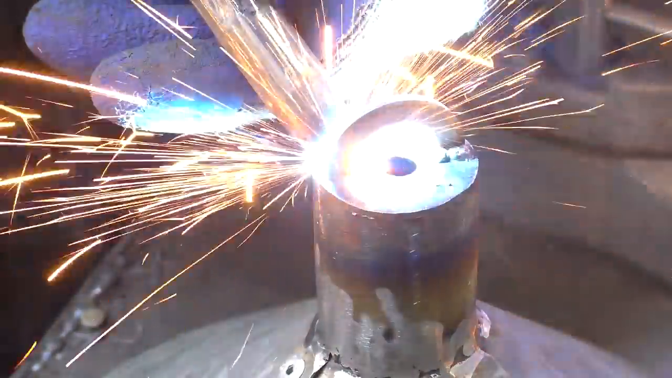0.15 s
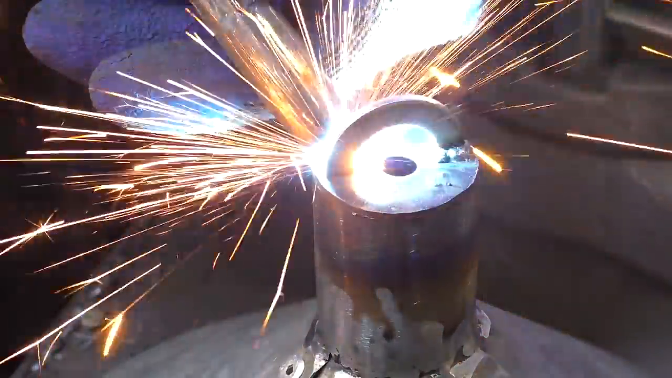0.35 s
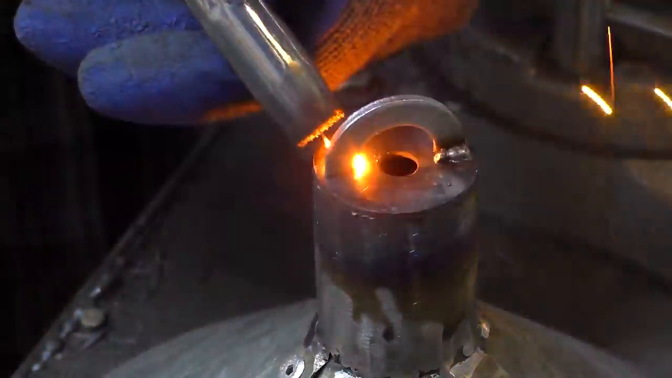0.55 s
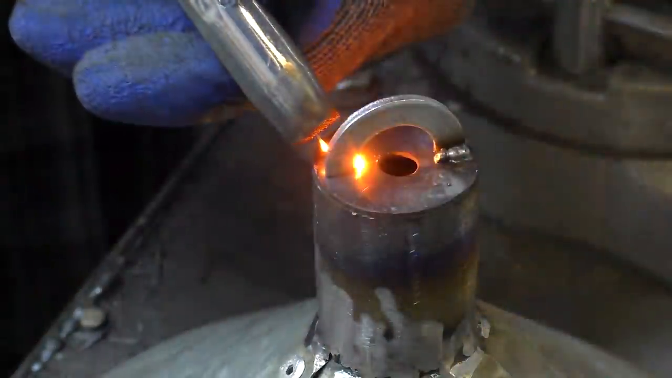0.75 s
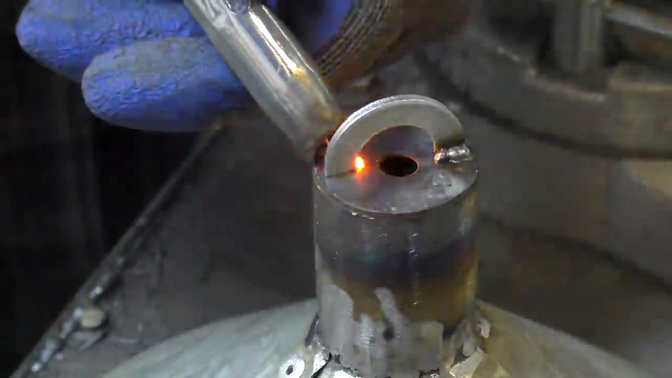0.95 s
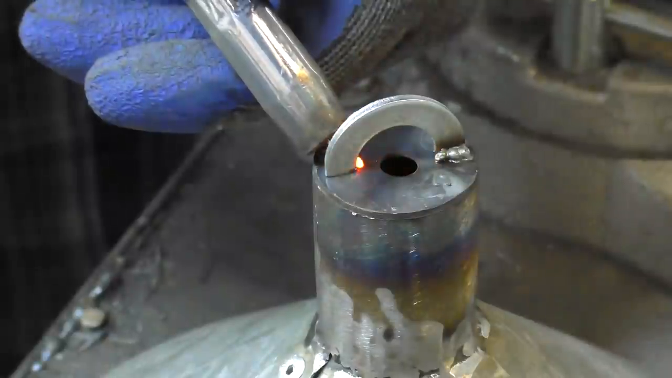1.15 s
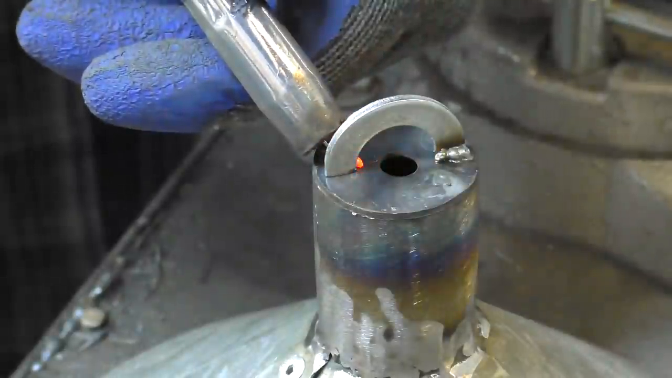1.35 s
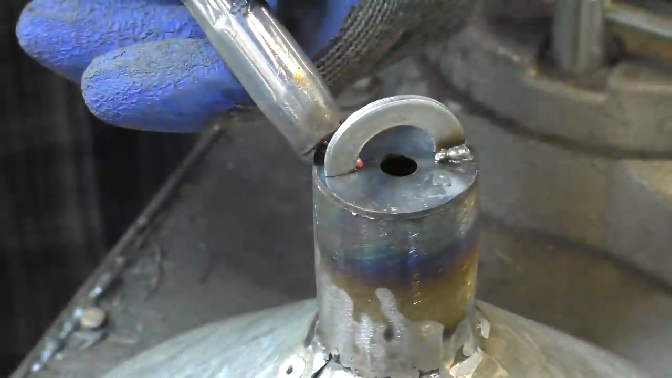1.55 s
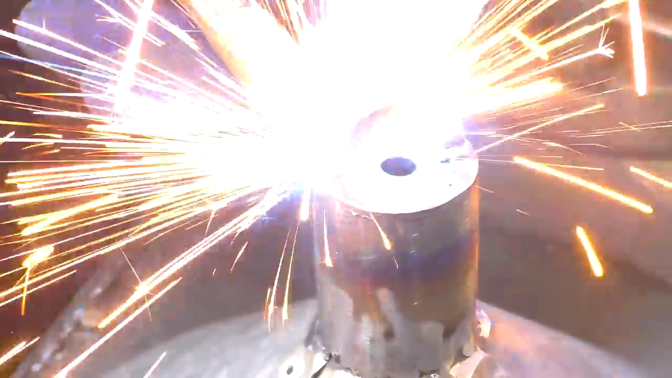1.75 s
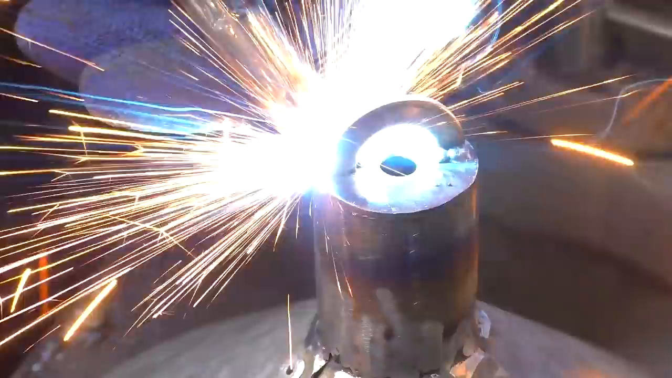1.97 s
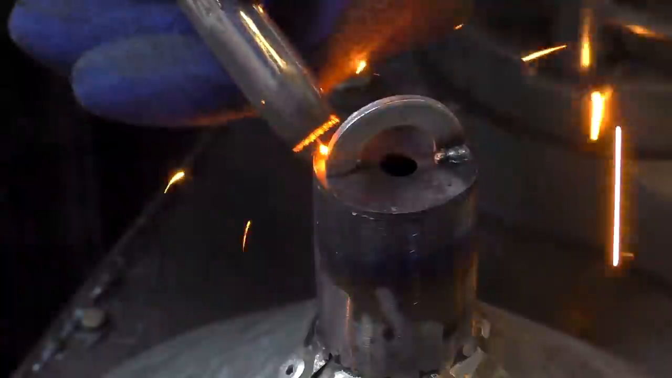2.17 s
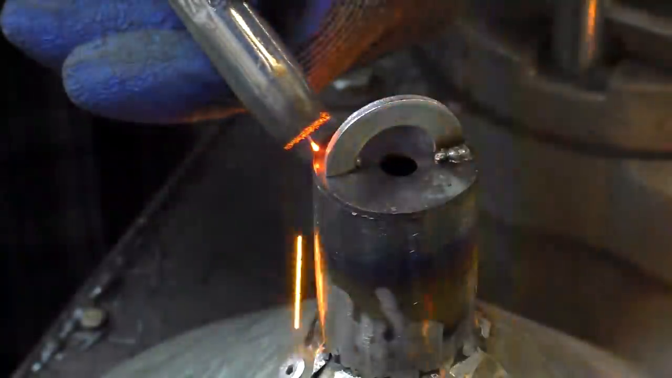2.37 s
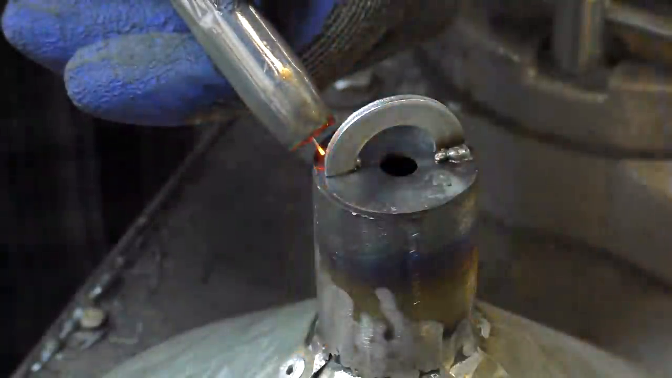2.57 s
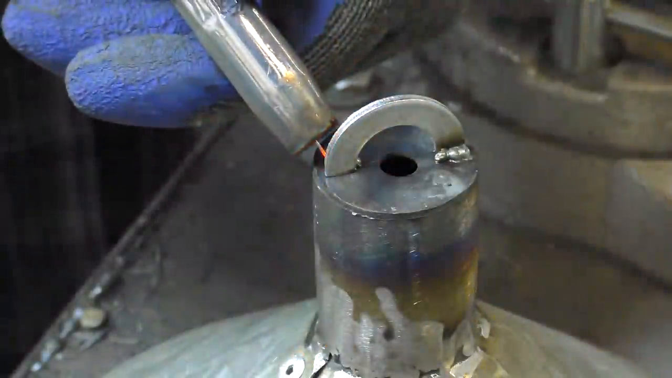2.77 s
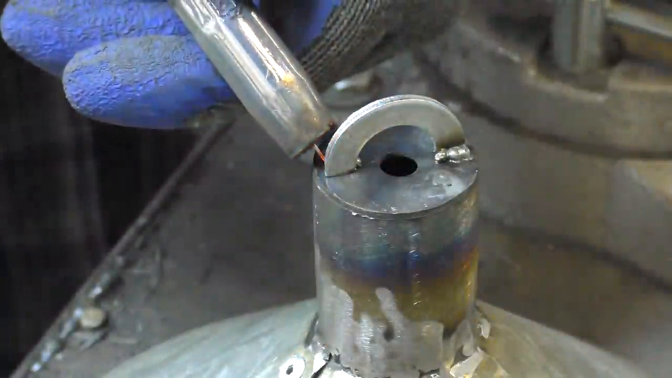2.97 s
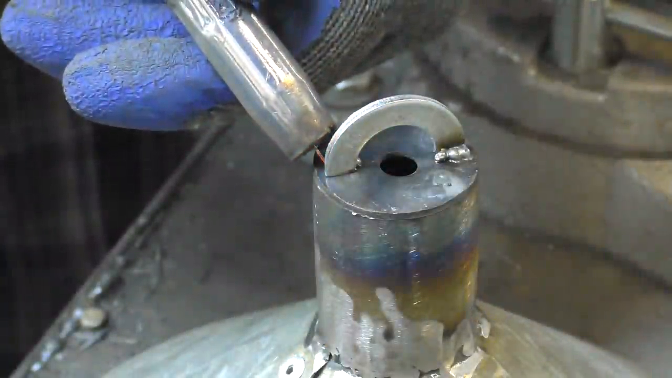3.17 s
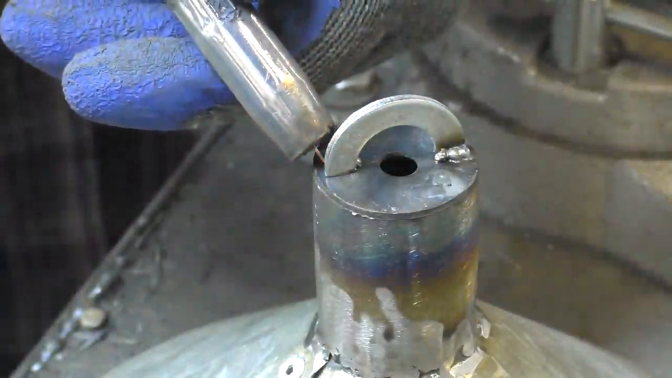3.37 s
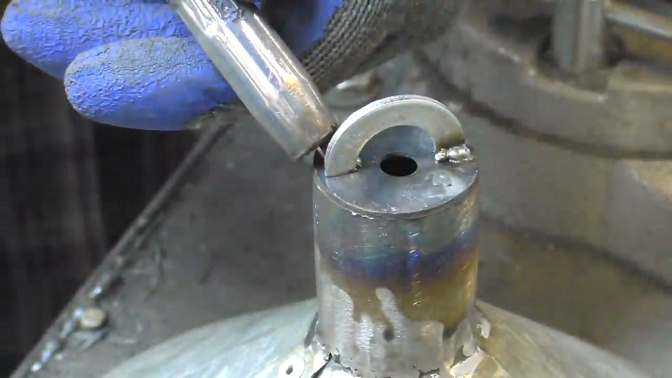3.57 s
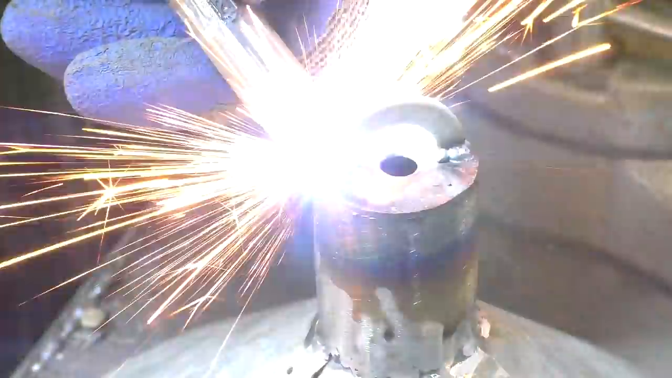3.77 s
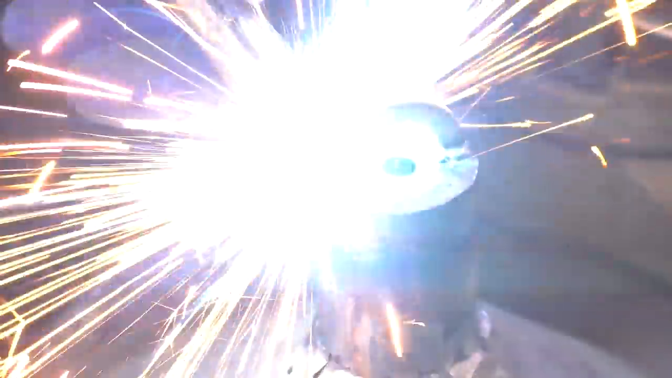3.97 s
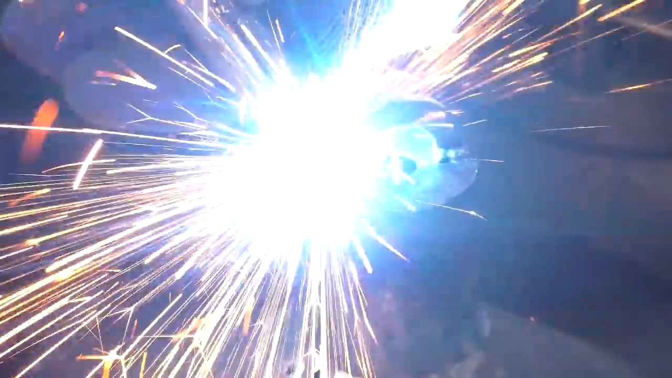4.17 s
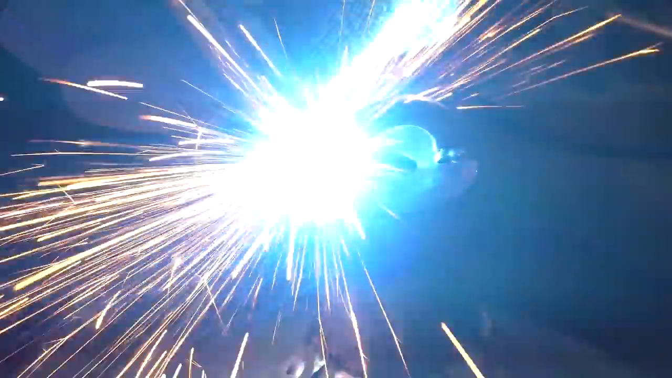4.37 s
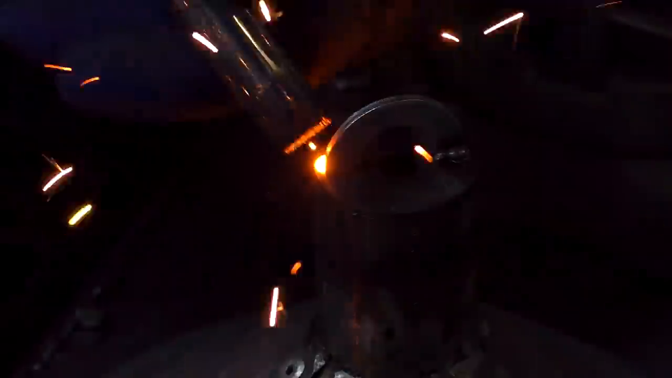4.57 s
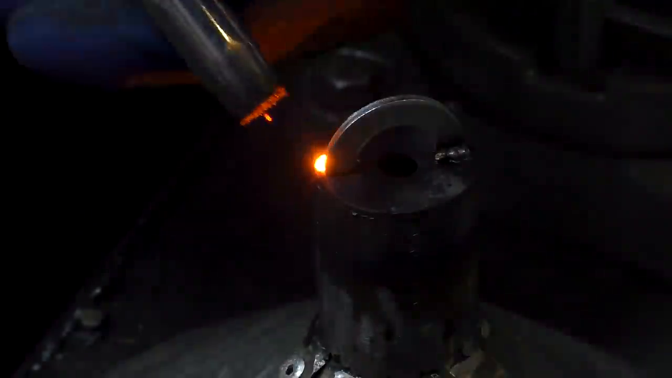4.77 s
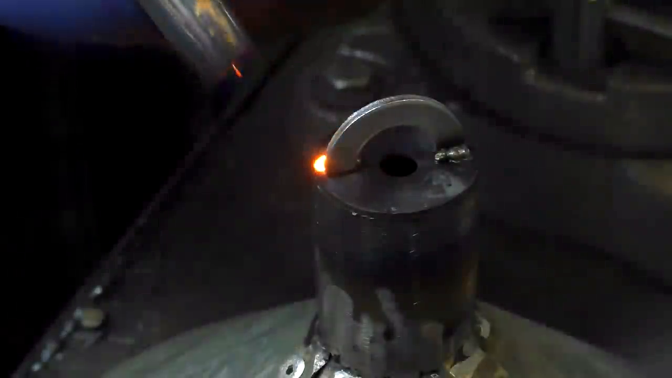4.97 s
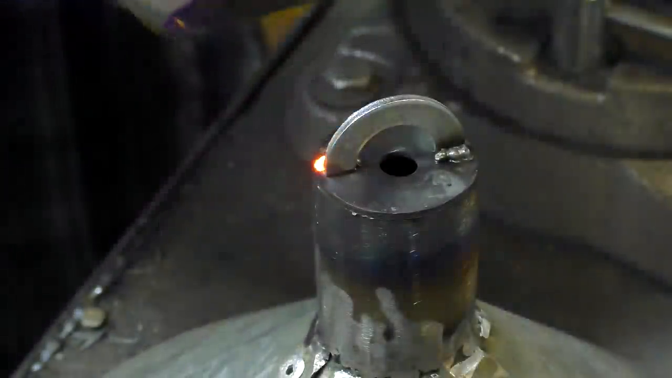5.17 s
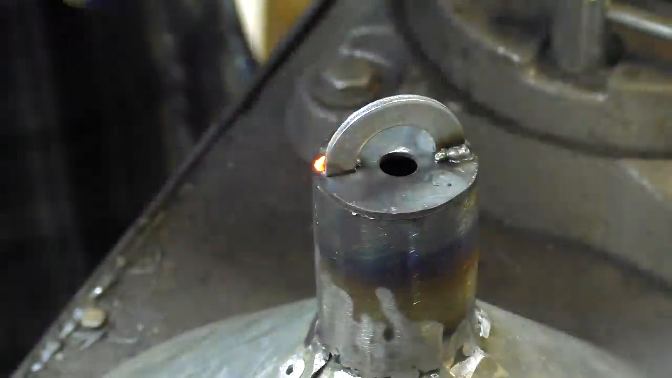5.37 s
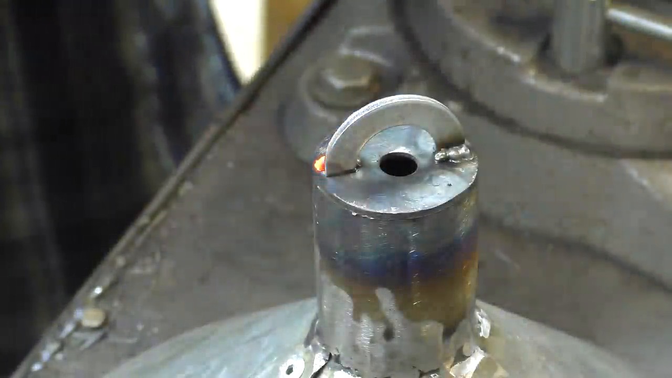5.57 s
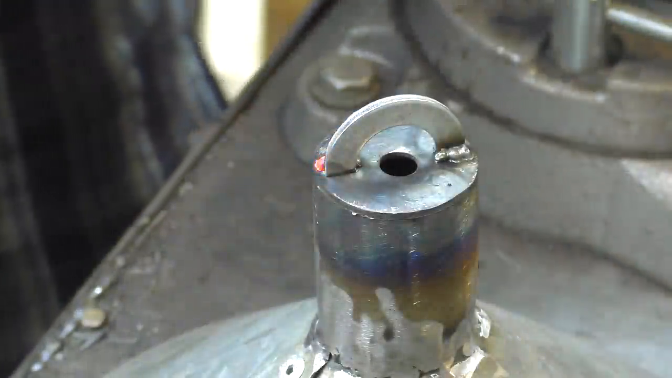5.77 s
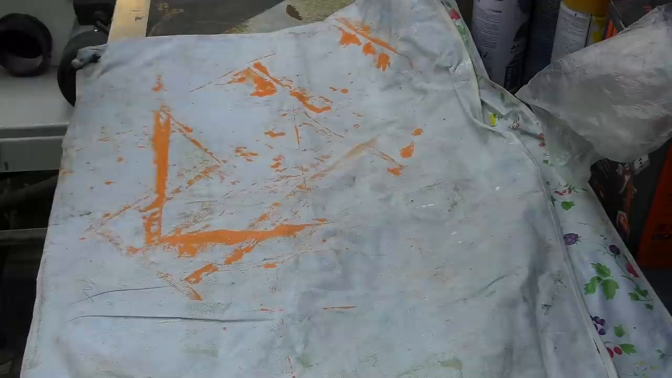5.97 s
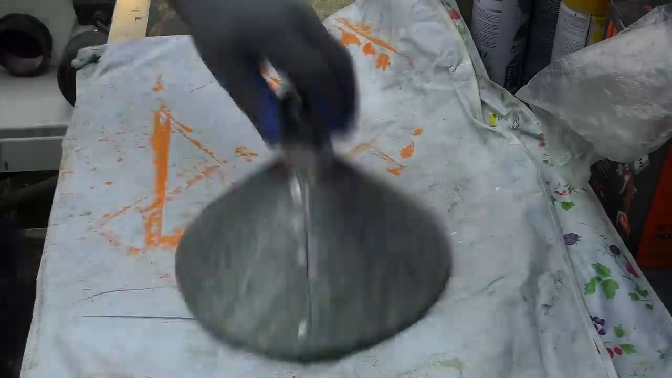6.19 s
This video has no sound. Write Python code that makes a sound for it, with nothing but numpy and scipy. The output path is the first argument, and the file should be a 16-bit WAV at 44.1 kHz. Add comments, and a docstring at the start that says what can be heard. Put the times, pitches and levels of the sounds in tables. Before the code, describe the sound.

An arc welder makes three short, loud, crackling welds over gas hiss and a humming fan, followed by faint spray can puffs.

```python
"""Three tack welds, then a spray can

A wire-feed arc welder, close up in a small workshop. The arc snaps each time the wire shorts, and drops
of metal burst in loud pops. Shielding gas hisses on after each weld; the welder's fan hums underneath,
ducked by gain control as the arc overloads. Then a hard cut to a quiet place with faint spray can puffs."""
import sys
import numpy as np
from scipy import signal
from scipy.fft import rfft, irfft, next_fast_len
from scipy.io import wavfile
from scipy.ndimage import uniform_filter1d

SR = 44100
rng = np.random.default_rng(int(sys.argv[2]) if len(sys.argv) > 2 else 0)


def put_to_file(sound):
    """Save the sound as 16-bit audio at rate SR, in the file named by the first command-line argument."""
    columns = np.atleast_2d(sound).T  # one column per channel
    safe = np.clip(columns, -1, 1)
    whole_steps = np.round(safe * 32767)
    wavfile.write(sys.argv[1], SR, whole_steps.astype(np.int16))


N = 274743
TIME = np.arange(N) / SR
SIDES = np.array([[1], [-1]])   # left, right

# Levels in the tables are relative: each layer gets its own gain in the mix.
# how alike the two channels of airy noise are: frequency_hz, likeness (0 to 1)
STEREO_LIKENESS = [(60, 0.65), (290, 0.95), (700, 0.76), (1500, 0.78), (3000, 0.53), (6800, 1),
                   (15000, 0.75)]
# room tone of the quiet place: frequency_hz, level_db
ROOM_TONE_COLOUR = [(24, -61), (40, -26), (301, -11.5), (522, -24), (1190, -5), (1490, -4), (1680, -6),
                    (3060, -8), (5300, -17.5), (15500, -15)]
# hiss of the spray can: frequency_hz, level_db
SPRAY_COLOUR = [(100, -31), (800, -9), (1500, 1), (3000, 1), (6000, -2.5), (11000, -5), (16000, -13)]
# puffs of the can: centre_s, half_width_s, level_db
SPRAY_PUFFS = [(5.986, 0.01, -40.5), (6.062, 0.012, -38), (6.099, 0.0059, -43), (6.152, 0.0098, -40.5),
               (6.235, 0.033, -52)]

# rush of the fan's cooling air: frequency_hz, level_db
FAN_COLOUR = [(30, -44), (90, -23), (150, -26.5), (230, -4), (290, -2), (345, -19), (410, -2.5), (500, -12),
              (780, -15), (1100, -7.5), (1600, -5), (2800, -5), (6000, -10.5), (16000, -20.5)]
# resonances of the welder's casing: centre_hz, width_hz, gain_db
CASING_RESONANCES = [(323, 98, 8.5), (386.5, 16, 6.5), (1490, 92, 4), (1635, 30, 10.5), (2110, 23, 4.5),
                     (2750, 80, 4)]
# fan blade and motor tones: pitch_hz, level_db
FAN_TONES = [(542, -44.5), (1084, -48.5), (1238.6, -38.5), (1548.3, -33.5), (1858, -31.5), (2167.6, -42),
             (2477, -46)]
# where the fan sits in the stereo image: frequency_hz, left_minus_right_db
FAN_BALANCE = [(60, -2), (380, -1.5), (700, 3.5), (1290, 2), (2380, -3), (4400, -0.5), (15000, -.5)]
# the fan comes up as the torch is taken away: time_s, gain_db
FAN_SWELL = [(1.5, -0.5), (3.5, -0.25), (5.5, 0.1), (5.88, 1.5)]

# hiss of the shielding gas: frequency_hz, level_db
GAS_COLOUR = [(60, -59.5), (700, -30.5), (1100, -13), (1450, -3), (2000, -8), (2500, -2), (3700, -8.5),
              (4700, -1), (6200, -8), (8100, -5), (11300, -9), (12500, -11.5), (16000, -16)]
# resonances of the gas nozzle: centre_hz, width_hz, gain_db
NOZZLE_RESONANCES = [(1550, 280, 7), (2402, 170, 7.5), (2725, 90, 9), (3214, 190, 9.5), (4170, 220, 7.5),
                     (4680, 70, 5), (4980, 110, 7.5), (5280, 80, 6), (5460, 130, -4), (7280, 160, 5),
                     (7600, 130, -5), (8150, 400, 7.5), (9680, 210, 5.5), (10480, 220, 7), (11460, 260, 7)]
# bright hiss of a valve spurt: frequency_hz, level_db
SPURT_COLOUR = [(100, -38), (1000, -9.5), (2500, -2.5), (6000, -7.5), (11000, -3.5), (13000, 3),
                (16000, -7)]
# gas spurts as the valve opens and shuts: start_s, length_s, level_db, fade_s
VALVE_SPURTS = [(1.65, 0.027, -14, 0.033), (3.007, 0.011, -14.5, 0.036), (3.779, 0.02, -14.5, 0.041),
                (5.421, 0.0092, -15.5, 0.034)]

# the three welds: arc_on_s, arc_off_s, first_snap_period_s, last_snap_period_s, gas_level_db
TACK_WELDS = [(0, 0.529, 0.0064, .007, -7), (1.701, 2.204, 0.0055, .0107, -11.5),
              (3.835, 4.615, .0061, .0064, -15.5)]
# broad tone of a snap: frequency_hz, level_db
ARC_COLOUR = [(40, -36), (300, -27), (700, -27), (1400, -11), (1900, -19), (2500, -9.5), (5000, -8),
              (7500, -2), (8700, -4.5), (10000, 2.5), (11500, -4), (13000, 2), (16000, -1)]
# resonances of torch and workpiece: centre_hz, width_hz, gain_db
STEEL_RESONANCES = [(2305, 140, 5.5), (2776, 80, 3.5), (3146, 90, 3.5), (4260, 780, 4.5), (5680, 160, 3.5),
                    (6590, 95, 4.5), (7334, 240, 7), (7900, 280, 3.5), (8230, 70, 3.5), (9520, 110, 8),
                    (9715, 120, 6.5), (10130, 200, 2), (10470, 300, 9), (11750, 400, -4), (12680, 340, 7),
                    (13300, 250, -3), (13800, 600, 2)]
# the torch shades the arc with two humps or dips, one pair per weld: centre_hz, width_hz, gain_db
TORCH_SHADING = [
    [(13000, 290, 4.5), (15500, 940, -11.5)],
    [(10000, 420, 7), (13400, 450, 2.5)],
    [(436, 240, -4.5), (15900, 470, -1)],
]
# early reflections off the nearby steel: delay_s, level_db
STEEL_ECHOES = [(.00038, -15), (.00082, -17.5), (.00135, -19), (.0017, -6.5), (.00235, -14), (.0035, -9),
                (.0054, -10)]
# the wire strikes and blows apart: start_s, length_s, level_db
WIRE_STRIKES = [(0, 0.0094, -28), (1.671, 0.0017, -51), (1.674, 0.0077, -40), (1.688, 0.0069, -27.5),
                (3.8146, 0.0037, -52), (3.821, 0.0067, -37)]
# force of the running crackle, one curve per weld: time_s, level_db
CRACKLE_CURVES = [
    [(0, -0.5), (.055, -11), (.075, -28), (.15, -15), (.24, -12), (.35, -12.5), (.38, -36), (.53, -42)],
    [(1.70, -9), (1.80, -6), (1.85, -13.5), (1.91, -12), (1.94, -16), (1.99, -11), (2.06, -9), (2.11, -15),
     (2.18, -8.5)],
    [(3.84, -27), (3.885, -17), (3.905, -7), (3.98, -12.5), (4.07, -18), (4.15, -13.5), (4.27, -14),
     (4.33, -8.5), (4.36, -12.5), (4.49, -10.5), (4.61, -15)],
]
# loud pops, where a drop of metal bursts: time_s, crack_db, thump_db
DROP_POPS = [(.0094, -4, -14), (0.0166, -7, -7), (.0746, -1.5, -6), (0.0899, -2.5, 8.5), (.1125, -2, 1.5),
             (0.1292, -2, 4), (.1449, -11, -16), (.1578, -7, -11), (.2004, -7, -15), (0.256, -5.5, 1),
             (0.2941, -4, 1), (0.3447, -7, -2), (0.3509, -18, 2), (0.3699, -2.5, -20), (0.4849, -4.5, 5),
             (0.5065, -9, -3), (0.5303, -6.5, 2), (1.6894, -8, -3), (1.7179, -2.5, -1), (1.7665, -2.5, 5),
             (1.8054, -2, -24), (1.9796, -3, -8), (1.9963, -6.5, 3), (2.0052, -9, 1), (2.0458, -9.5, 1),
             (2.1584, -9, -1), (2.169, -1, 1), (2.1886, -9, -1), (2.2044, -11.5, -4), (3.8404, -12, -28),
             (3.8535, -12.5, -18), (3.8711, -7, -13), (3.8818, -7, -9), (3.923, -3.5, 6), (3.9333, -4.5, 3),
             (4.16, -11, -12), (4.2926, -10.5, -29), (4.3696, -4.5, 2.5), (4.6093, -10, -10)]

ARC_DB, FAN_AIR_DB, FAN_TONES_DB, ROOM_TONE_DB = 30, -25.5, 2.0, -43.5
POP_THUMP_TRIM_DB, SNAP_THUMP_DB = -1.5, -6.5   # a small snap's thump is relative to its crack
SCENE_CUT_S = 5.908


def from_db(db):
    """Decibels to gain."""
    return 10 ** (np.asarray(db) / 20)


def at_hz(points, hz):
    """Read a table on a log-frequency axis."""
    f, value = np.transpose(points)
    return np.interp(np.log(np.maximum(hz, 1)), np.log(f), value)


def colour(spectrum, resonances, hz):
    """EQ gain: a broad curve with resonant peaks and dips on it."""
    peaks_db = sum(db / (1 + (2 * (hz - centre) / width) ** 2) for centre, width, db in resonances)
    return from_db(at_hz(spectrum, hz) + peaks_db)


def drift(rate_hz):
    """Slow random wander, roughly between -1 and 1."""
    knots = rng.standard_normal(N // 100)
    return np.interp(TIME * rate_hz, np.arange(len(knots)), knots)


def smooth(x, seconds):
    """One-pole lag."""
    pole = np.exp(-1 / (seconds * SR))
    return signal.lfilter([1 - pole], [1, -pole], x, zi=[pole * x[0]])[0]


def clicks(times, db):
    """Single-sample kicks at the given times."""
    out = np.zeros(N)
    np.add.at(out, np.round(np.abs(times) * SR).astype(int), from_db(db))
    return out


def unit_power(x):
    """Scale to an rms of 1."""
    return x / np.sqrt(np.mean(x ** 2) + 1e-20)


def air_noise(spectrum, resonances=(), balance=None):
    """Stereo turbulence in a given colour, at unit power."""
    size = next_fast_len(N)
    hz = np.fft.rfftfreq(size, 1 / SR)
    mid, side = rfft(rng.standard_normal((2, size)))
    alike = np.clip(at_hz(STEREO_LIKENESS, hz), 0, 1)
    pair = np.sqrt(1 + alike) * mid + np.sqrt(1 - alike) * side * SIDES
    if balance:
        pair = pair * from_db(SIDES * at_hz(balance, hz) / 2)
    return unit_power(irfft(pair * colour(spectrum, resonances, hz), size)[:, :N])


def spray_can():
    """Short, soft puffs of hiss over a bed of quiet room tone."""
    puffs = sum(from_db(db) * np.exp(-.5 * ((TIME - centre) / half_width) ** 2)
                for centre, half_width, db in SPRAY_PUFFS)
    return puffs * air_noise(SPRAY_COLOUR) + from_db(ROOM_TONE_DB) * air_noise(ROOM_TONE_COLOUR)


def fan(speed_wobble, waver_db):
    """Blade and motor tones share one slightly unsteady speed, over cooling air rushing in the casing."""
    clock = np.cumsum(1 + speed_wobble * drift(9)) / SR
    tones = 0
    for hz, db in FAN_TONES:
        phase = rng.uniform(0, 2 * np.pi) + 0.32 * SIDES
        level_db = db + waver_db * drift(14) + at_hz(FAN_BALANCE, hz) * SIDES / 2
        tones = tones + np.sqrt(2) * from_db(level_db) * np.sin(2 * np.pi * hz * clock + phase)
    air = air_noise(FAN_COLOUR, CASING_RESONANCES, FAN_BALANCE)
    swell = from_db(np.interp(TIME, *np.transpose(FAN_SWELL)))
    return swell * (from_db(FAN_TONES_DB) * tones + from_db(FAN_AIR_DB) * air)


def gas_flow_db(rise_s=.035, post_flow_s=0.8304, sag_db_per_s=4.5, shut_db_per_s=360):
    """Gas holds steady under the arc, runs on as the hose pressure sags, then the valve shuts."""
    flows = []
    for start, end, _, _, db in TACK_WELDS:
        opening = 20 * np.log10(np.clip((TIME - start) / rise_s, 1e-5, 1))
        sag = sag_db_per_s * np.maximum(TIME - end, 0)
        shut = shut_db_per_s * np.clip(TIME - end - post_flow_s, 0, .5)
        flows.append(db + opening - sag - shut)
    return np.max(flows, axis=0)


def shielding_gas(flutter_db, brightening, split_hz, neutral_flow_db):
    """Gas rushes through the nozzle, duller as it weakens, with a bright spurt when the valve moves."""
    flow_db = gas_flow_db() + flutter_db * drift(40)
    jet = air_noise(GAS_COLOUR, NOZZLE_RESONANCES)
    body = signal.sosfiltfilt(signal.butter(2, split_hz, fs=SR, output="sos"), jet)
    treble = (jet - body) * from_db(brightening * (flow_db - neutral_flow_db))
    spurts = 0
    for start, length, db, fade in VALVE_SPURTS:
        attack = np.clip((TIME - start) / 0.0048, 0, 1)
        release = np.exp(-np.maximum(TIME - start - length, 0) / fade)
        spurts = spurts + from_db(db) * attack * release
    return from_db(flow_db) * (body + treble) + spurts * air_noise(SPURT_COLOUR)


def snap_response(shading, scatter_db, scatter_t60_s, room_db, room_t60_s, width, skew_s, dispersion_s):
    """One snap: the direct crack, echoes off the steel, scatter from the bench and the room's tail."""
    size = 2 ** 15
    t, hz = np.arange(size) / SR, np.fft.rfftfreq(size, 1 / SR)
    paths = np.ones((2, len(hz)), complex)
    for k, (delay, db) in enumerate(STEEL_ECHOES):   # from left and right in turn
        paths += from_db(db) * np.exp(-2j * np.pi * hz * (delay + (-1) ** k * SIDES * skew_s))
    for db, t60 in (scatter_db, scatter_t60_s), (room_db, room_t60_s):
        mid, side = rng.standard_normal((2, size))
        tail = (mid + width * side * SIDES) * from_db(-60 * t / t60)
        paths += from_db(db) * rfft(unit_power(tail)) / np.sqrt(size)
    # the paths spread the snap in time; its colour is that of the arc and the steel
    path_colour = np.sqrt(uniform_filter1d(np.mean(np.abs(paths) ** 2, axis=0), size=150))
    treble_fall = 1 / np.sqrt(1 + (hz / 17000) ** 24)
    tone = colour(ARC_COLOUR, STEEL_RESONANCES + shading, hz) * treble_fall / path_colour
    # the steel rings only after it is hit: minimum phase
    cepstrum = irfft(np.log(tone))
    cepstrum[1:size // 2] *= 2
    cepstrum[size // 2 + 1:] = 0
    ring = np.exp(rfft(cepstrum))
    # the treble lags a little, so the crack swings both ways instead of making one spike
    lag = np.exp(-2j * np.pi * dispersion_s * hz ** 2 / SR)
    snap = np.roll(irfft(paths * lag * ring), 12, axis=1)[:, :size // 2]
    return snap / np.sqrt(np.mean(snap[:, :round(.003 * SR)] ** 2))   # unit power in the first 3 ms


def crackle(weld, curve, spread_db=2.5, jitter=.24, thump_spread_db=5.5, clear_s=.0055, count=200):
    """Times, cracks and thumps of the wire's short circuits; a longer wait ends in a harder snap."""
    start, end, first_period, last_period, _ = weld
    wait, weight = rng.standard_normal((2, count))
    slowing = (last_period - first_period) / (end - start)
    periods = first_period * np.exp(np.minimum(slowing * np.arange(count), 2))
    times = start + np.cumsum(periods * np.exp(jitter * wait))
    crack_db = np.interp(times, *np.transpose(curve)) + spread_db * wait
    thump_db = crack_db + SNAP_THUMP_DB + thump_spread_db * weight
    # a pop clears the wire, so the crackle leaves a gap around it
    nearest_pop_s = np.abs(times[:, None] - np.array(DROP_POPS)[:, 0]).min(axis=1)
    keep = (times < end) & (nearest_pop_s > clear_s)
    return times[keep], crack_db[keep], thump_db[keep]


def wire_stutter(start_s=.3652, end_s=.49, period_s=.01925, pair_gap_s=.0048, level_db=-11.5):
    """Late in the first weld the wire stubs against the pool and snaps in even pairs."""
    times = np.arange(start_s, end_s, period_s)
    return clicks(np.concatenate([times, times + pair_gap_s]), level_db)


def arc(sizzle_db, thump_cutoff_hz):
    """The wire shorts and burns free over and over, and the plasma sizzles in between."""
    pop_times, pop_db, pop_thump_db = np.transpose(DROP_POPS)
    stutter = wire_stutter()
    kicks = clicks(pop_times, pop_db) + stutter
    thump_kicks = clicks(pop_times, pop_thump_db + POP_THUMP_TRIM_DB) + from_db(SNAP_THUMP_DB) * stutter
    noise = rng.standard_normal(N)
    for start, length, db in WIRE_STRIKES:
        kicks += from_db(db) * noise * (TIME > start) * (TIME < start + length)
    cracks = 0
    for weld, curve, shading in zip(TACK_WELDS, CRACKLE_CURVES, TORCH_SHADING):
        start, end = weld[:2]
        times, crack_db, thump_db = crackle(weld, curve)
        thump_kicks += clicks(times, thump_db)
        drive = kicks * (TIME > start - .5) * (TIME < end + .5) + clicks(times, crack_db)
        drive += from_db(sizzle_db) * noise * (TIME > start) * (TIME < end)
        snap = snap_response(shading, scatter_db=0.0, scatter_t60_s=0.031, room_db=-5.0, room_t60_s=0.26,
                             width=0.31, skew_s=.000005, dispersion_s=0.0004095)
        cracks = cracks + signal.oaconvolve(drive[None], snap, axes=1)[:, :N]
    # a low thump sounds under each burst as it overloads the recorder
    thumps = signal.sosfilt(signal.butter(2, thump_cutoff_hz, fs=SR, output="sos"), thump_kicks + 1e-18)
    return from_db(ARC_DB - .4 * SIDES) * (cracks - thumps)   # a touch to the right


def scene():
    """The welding bench, then a hard cut to the spray can."""
    bench = arc(sizzle_db=-44.5, thump_cutoff_hz=1050) + fan(speed_wobble=0.00127, waver_db=2.5)
    bench += shielding_gas(flutter_db=0.03, brightening=0.66, split_hz=4300.0, neutral_flow_db=-11.0)
    at_bench = np.clip((SCENE_CUT_S - TIME) / .003, 0, 1)
    return at_bench * bench + (1 - at_bench) * spray_can()


def gain_control(x, threshold_db, range_db, attack_s, release_db_per_s, memory_s, memory_share):
    """Loud sound ducks the gain; it comes back quickly at first, then slowly after a long overload."""
    power = uniform_filter1d(np.mean(x ** 2, axis=0), size=64)
    level_db = 10 * np.log10(np.maximum(power, 1e-12))
    # fully ducked at the start, where the arc is already burning
    excess_db = np.where(TIME < .01, range_db, level_db - threshold_db)
    release_db = release_db_per_s * TIME
    held_db = np.maximum.accumulate(excess_db + release_db) - release_db
    fast_db = smooth(np.clip(held_db, 0, range_db), attack_s)
    slow_db = memory_share * smooth(fast_db * (TIME > 0), memory_s)
    return x * from_db(-np.maximum(fast_db, slow_db))


def record(dry):
    """Gain control, hard clipping on the snaps, and the top end cut off."""
    levelled = gain_control(dry, threshold_db=-8.5, range_db=31.0, attack_s=0.0088,
                            release_db_per_s=148.0, memory_s=0.6, memory_share=0.65)
    # one side flattens sooner, which leaves a low thump under the loudest snaps
    clipped = np.clip(levelled, -1, 0.967)
    high_cut = signal.firwin(301, cutoff=15750, fs=SR)
    return signal.fftconvolve(clipped, high_cut[None], mode="same", axes=1)


dry = scene()
out = record(dry)
put_to_file(out)
```